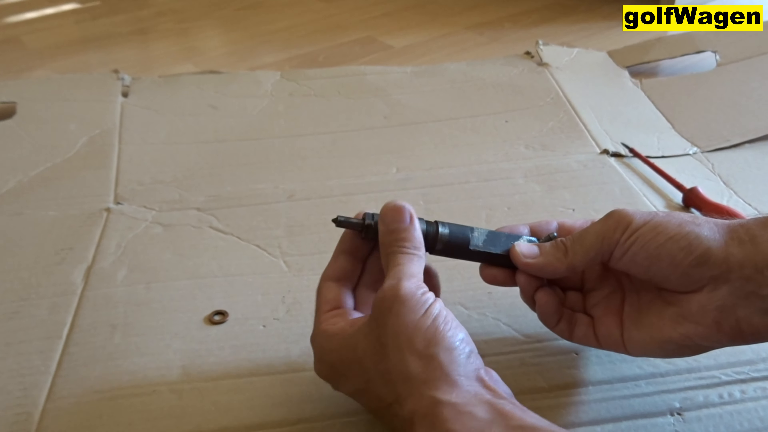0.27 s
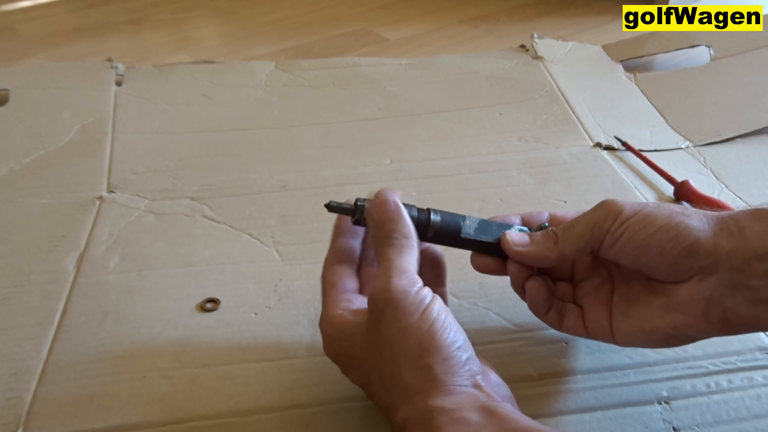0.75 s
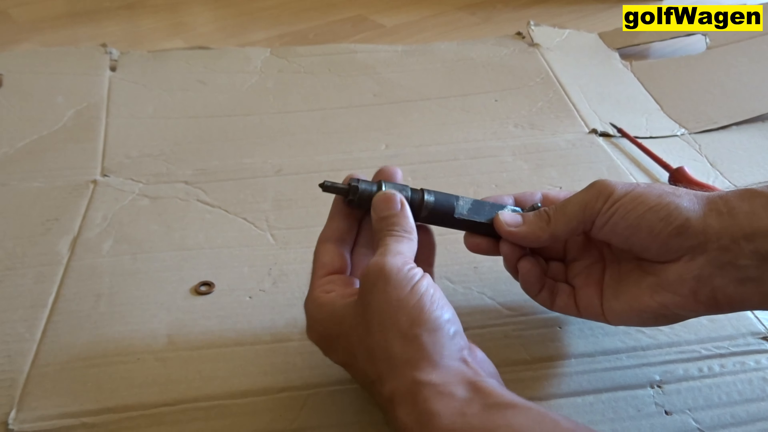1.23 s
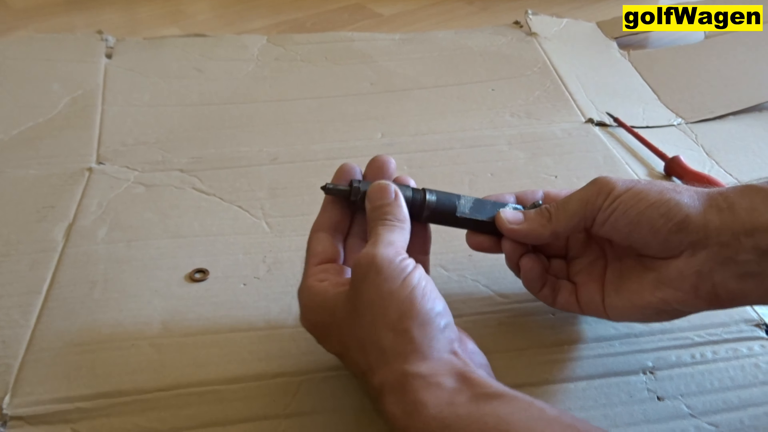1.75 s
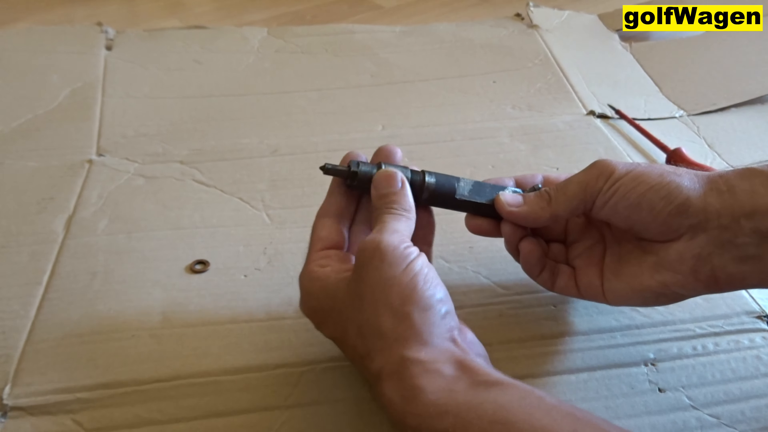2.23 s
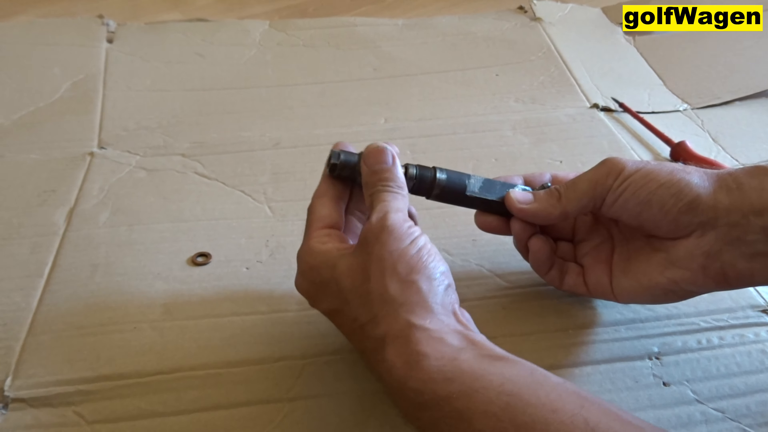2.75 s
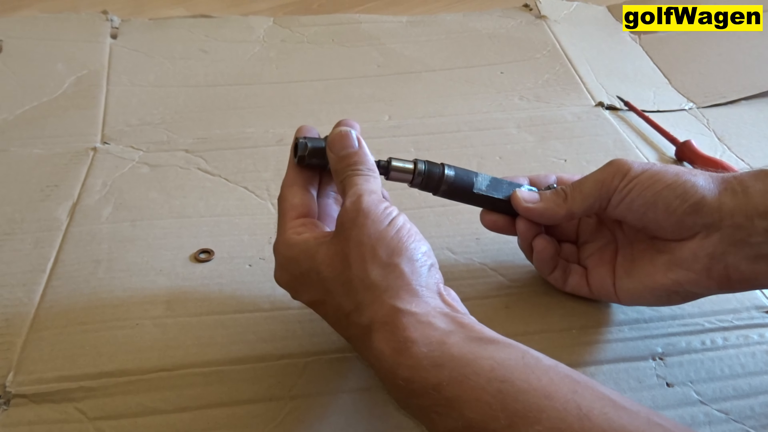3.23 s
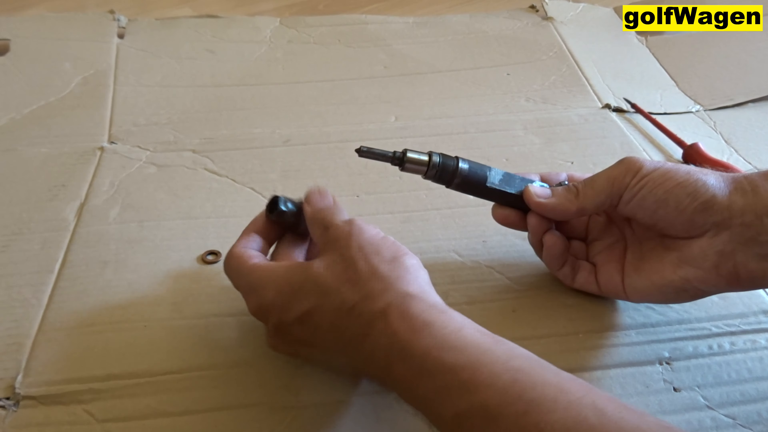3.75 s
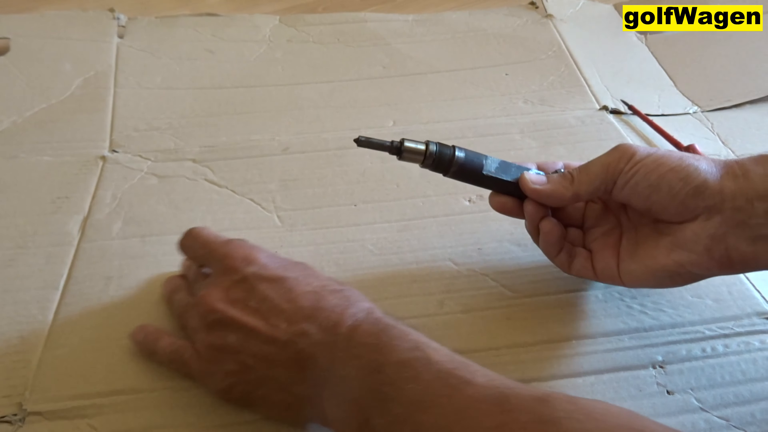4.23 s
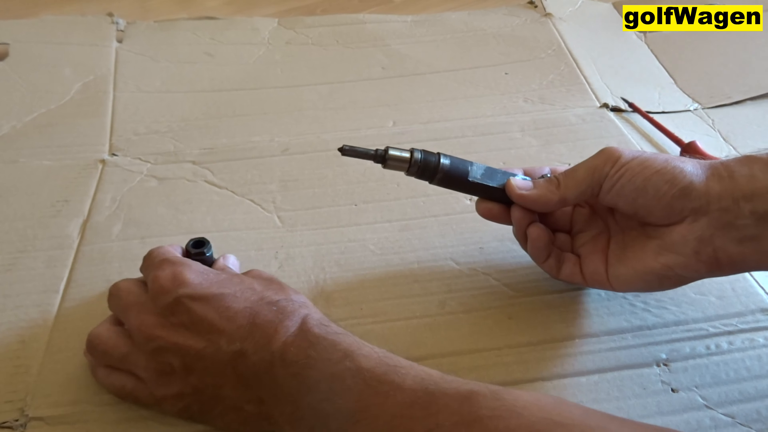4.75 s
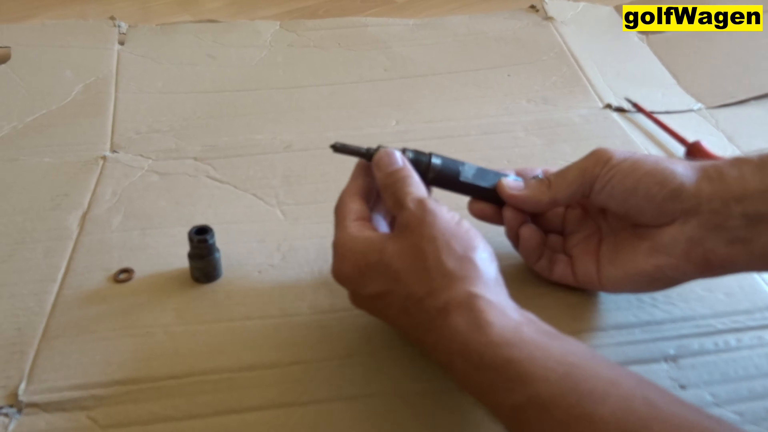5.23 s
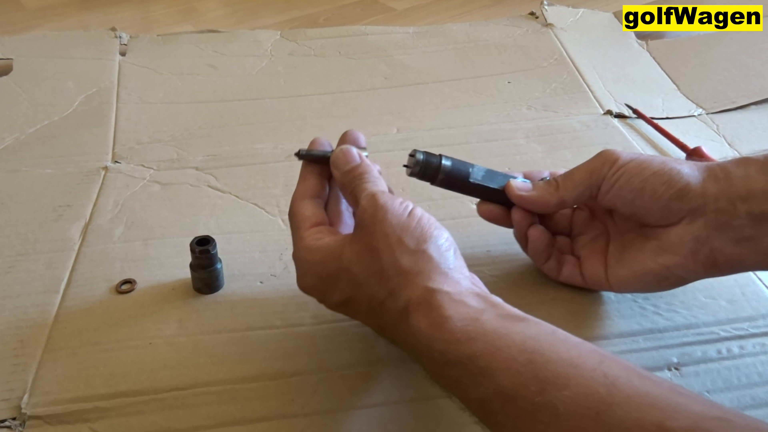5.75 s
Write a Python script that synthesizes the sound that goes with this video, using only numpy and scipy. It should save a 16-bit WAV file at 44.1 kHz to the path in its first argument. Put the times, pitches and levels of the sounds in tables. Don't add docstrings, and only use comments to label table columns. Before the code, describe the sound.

In a quiet, faintly humming workshop, a close small microphone hears a steel nut turned by hand in short gritty pushes with sharp clicks. It comes loose with bright rattling rings, then skin hisses over cardboard, the nut knocks down and scrapes, and faint ticks with a hollow rub follow.

```python
import sys
import numpy as np
from scipy import signal
from scipy.fft import rfft, irfft, next_fast_len
from scipy.io import wavfile
from scipy.ndimage import uniform_filter1d

SR = 44100
rng = np.random.default_rng(int(sys.argv[2]) if len(sys.argv) > 2 else 0)


def waveform_to_disk(signal):
    frames = np.transpose(np.atleast_2d(signal))
    scaled = np.clip(frames, -1, 1) * 32767
    samples = np.round(scaled).astype(np.int16)
    wavfile.write(sys.argv[1], SR, samples)


def gain_from_db(level_db):
    decades = np.asarray(level_db, float) / 20
    return 10 ** decades


N = 263717
TIME = np.arange(N) / SR
LOOSE_S = 2.34
SILENT_DB = -140
# (f/Hz, level/dB, t60/s)
FREE_RING = [(9970, -9, .12), (10050, -4, .17), (10078, 0, .22), (10140, -9, .12), (10250, -8, .1),
             (10430, -13, .07), (11560, -15, .1)]


def shade(x, points):
    hz, db = np.transpose(points)
    size = next_fast_len(N)
    bins_hz = np.fft.rfftfreq(size, 1 / SR)
    gain = gain_from_db(np.interp(np.log(bins_hz + 1), np.log(hz), db))
    return irfft(rfft(x, size) * gain, size)[..., :N]


def unit(x):
    return x / np.sqrt(np.mean(x ** 2))


def ring(x, hz, width):
    pole = np.exp((2j * np.pi * hz - np.pi * width) / SR)
    return signal.lfilter([1], [1, -pole], x).imag


def band(x, hz, width):
    return unit(ring(ring(x, hz, width), hz, width))


def glide(x, hz, width):
    turn = np.exp(2j * np.pi * np.cumsum(hz) / SR)
    pole = np.exp(-np.pi * width / SR)
    resonance = signal.lfilter([1], [1, -2 * pole, pole ** 2], x / turn)
    return unit((resonance * turn).imag)


def walk(rate):
    hold = int(SR / rate)
    steps = np.repeat(rng.standard_normal(N // hold + 1), hold)
    return unit(uniform_filter1d(steps, hold)[:N])


def grit(rate, spread_db, gust_db, gust_rate):
    sizes = rng.choice([-1, 1], N) * gain_from_db(spread_db * np.minimum(rng.exponential(size=N), 3))
    slips = (rng.random(N) < rate / SR) * sizes
    return unit(slips * gain_from_db(gust_db * walk(gust_rate)))


def blows(times, db):
    out = np.zeros(N)
    np.add.at(out, (np.asarray(times) * SR).astype(int), gain_from_db(db))
    return out


def bell(x, modes, scatter_db):
    out = np.zeros(N)
    for hz, db, t60 in modes:
        struck = x * gain_from_db(scatter_db * walk(440))
        out += gain_from_db(db) * ring(struck, hz, np.log(1000) / np.pi / t60)
    return out


def strokes(rows, attack_db_s, release_db_s, part=False):
    out = np.full(N, float(SILENT_DB))
    for start, end, first_db, last_db, part_db in rows:
        db = np.interp(TIME, [start, end], [first_db, last_db]) + part * part_db
        rise = attack_db_s * np.maximum(start - TIME, 0)
        fall = release_db_s * np.maximum(TIME - end, 0)
        out = np.maximum(out, db - rise - fall)
    return uniform_filter1d(out, size=200)


def shop():
    # (f/Hz, level/dB per Hz)
    shop_colour = [(15, -33), (25, -12), (150, -1.5), (208, -3.5), (232, -5.5), (288, -10.5), (457, -19),
                   (538, -3.5), (617, -9.5), (1510, -21), (2530, -20.5), (3230, -25.5), (14000, -29.5),
                   (15200, -28.5), (16500, -19)]
    # (f/Hz, side minus mid/dB)
    width_colour = [(30, -41), (60, -18), (125, -23.5), (250, -8.5), (500, -1.5), (1000, -1.5),
                    (4000, -7.5), (16000, -19)]
    # (f/Hz, width/Hz, level/dB)
    hums = [(119.5, 24, -68.5), (555, 144, -64), (1510, 150, -73), (15650, 200, -83)]
    mid, side = shade(rng.standard_normal((2, N)), shop_colour)
    hum = np.zeros(N)
    for hz, width, db in hums:
        hum += gain_from_db(db + 4.0 * walk(5.01)) * band(rng.standard_normal(N), hz, width)
    gain = gain_from_db(-56 + 1.3 * walk(6.3)) / np.std(mid)
    return gain * mid + hum, gain * shade(side, width_colour)


def arm():
    # (t/s, level/dB)
    arm_level = [(1.3, -63), (1.45, -62.5), (1.75, -61), (1.96, -59.5), (2.05, -60.5), (2.15, -55),
                 (2.3, -67), (3.62, -71), (3.72, -59.5), (4.1, -57), (4.4, -56.5), (4.6, -59),
                 (4.64, -49.5), (4.85, -57.5), (5.2, -55), (5.3, -59.5), (5.98, -54.5)]
    rumble = shade(rng.standard_normal(N), [(150, -9.5), (280, 1.5), (600, 1.5), (1200, -5.0), (2000, -22)])
    return gain_from_db(np.interp(TIME, *np.transpose(arm_level))) * unit(rumble)


def thread():
    # (f/Hz, width/Hz, level/dB)
    thread_modes = [(2640, 450, 6), (3500, 650, 4.5), (5260, 860, 2.5), (6500, 920, -14),
                    (8900, 230, -10.5), (10300, 320, -9.5), (11900, 1900, -0.5), (14200, 3300, -31)]
    # (t/s, f/Hz)
    grip_pitch = [(0, 11400), (.22, 10300), (.29, 11750), (.36, 11000), (.55, 11100), (.61, 10900),
                  (.67, 11100), (.89, 11400), (1.05, 11200), (1.3, 11210), (1.56, 10700), (1.6, 11900),
                  (1.64, 10800), (1.8, 10720), (1.83, 11100), (2.03, 11000), (2.1, 11450), (2.3, 11200)]
    # (from t/s, to t/s, first level/dB, last level/dB, low body modes relative level/dB)
    pushes = [(.01, .035, -48.5, -47, -7), (.24, .362, -48, -48.5, -8), (.555, .6, -48, -50, -7.5),
              (.62, .672, -43.5, -46.5, -8.5), (.888, .9, -48.5, -51.5, -5.5),
              (.935, 1.055, -59.5, -49, -6.5), (1.297, 1.307, -43, -42.5, -7.5),
              (1.34, 1.39, -54, -44.5, -6), (1.548, 1.643, -45.5, -43, -7), (1.69, 1.696, -49, -60, -19),
              (1.79, 1.886, -48, -37, -12.5), (2.045, 2.116, -41, -43, -9), (2.265, 2.3, -52.5, -44, -5)]
    rattles = [(2.314, 2.36, -30, -28.5, -13.5), (2.66, 2.7, -58, -54, -12), (3.37, 3.42, -65, -65, -20),
               (2.37, 2.474, -25.5, -42.5, -16.5), (2.492, 2.536, -39, -45, -14.5),
               (2.545, 2.56, -39, -45.5, -11.5), (2.765, 2.81, -32, -49, -21), (2.925, 2.978, -62, -62, -6),
               (3.029, 3.043, -33.5, -45, -27), (3.056, 3.1, -29, -40.5, -14.5),
               (3.123, 3.2, -46.5, -57, -8), (3.43, 3.45, -52, -59, -29)]
    push_attack_db_s, push_release_db_s = 446, 471
    rattle_attack_db_s, rattle_release_db_s = 5000, 400
    body_release_db_s = 175

    slips = grit(6000, spread_db=3, gust_db=1.8, gust_rate=220)
    grind = grit(9000, spread_db=3, gust_db=1.5, gust_rate=90)
    body, bright = np.zeros((2, N))
    for hz, width, db in thread_modes:
        if hz < 7500:
            body += gain_from_db(db + 3 * walk(45)) * glide(grind, hz * (1 + 0.03 * walk(25)), width)
        else:
            bright += gain_from_db(db + 2.2 * walk(45)) * glide(slips, hz * (1 + 0.0072 * walk(25)), width)

    rasp = unit(shade(grind[::-1], [(1200, -12), (2200, 0), (3300, -2.5), (7500, -10.5), (9000, -13)]))
    rasp_gain = np.where(TIME < LOOSE_S, 1.1, 2.2) * gain_from_db(2 * walk(120))
    low = unit(unit(body) + rasp_gain * rasp)

    main_hz = np.interp(TIME, *np.transpose(grip_pitch)) + 120 * walk(60)
    main = gain_from_db(2.5 * walk(150)) * glide(slips, main_hz, 720)
    held = unit(main + bright)

    rattle = unit(shade(slips, [(2000, -30.5), (8500, 0), (9800, 8), (11000, 13), (13000, 8), (16000, 0)]))
    loose = gain_from_db(-7.5) * rattle + gain_from_db(-5.5) * unit(bell(slips, FREE_RING, 0))

    level_db = np.maximum(strokes(pushes, push_attack_db_s, push_release_db_s),
                          strokes(rattles, rattle_attack_db_s, rattle_release_db_s))
    body_db = np.maximum(strokes(pushes, push_attack_db_s, body_release_db_s, part=True),
                         strokes(rattles, rattle_attack_db_s, body_release_db_s, part=True))
    return gain_from_db(level_db) * np.where(TIME < LOOSE_S, held, loose) + gain_from_db(body_db) * low


def knocks():
    # (t/s, peak level/dB, f/Hz, t60/s)
    board_contacts = [(.157, -44, 600, 0.074), (1.438, -32, 1060, 0.021), (1.954, -40.5, 790, 0.108),
                      (2.124, -41.5, 1473, 0.13), (2.147, -38.5, 1490, 0.054), (4.076, -26.5, 776, 0.1),
                      (4.08, -31, 820, 0.11), (4.182, -30, 950, .1), (4.183, -15, 1310, 0.031),
                      (4.189, -24.5, 948, 0.42), (4.202, -19.5, 1275, 0.04), (4.2175, -25.5, 1060, 0.11),
                      (4.234, -26, 1160, .08), (4.258, -25, 1070, 0.061), (4.247, -35, 1490, 0.042),
                      (4.292, -27, 1720, 0.046), (4.306, -26, 1780, 0.059), (4.316, -25, 1480, .05),
                      (4.326, -37, 1216, .05), (4.387, -32, 1150, .05), (4.339, -24.5, 1350, 0.044),
                      (4.415, -24, 1330, 0.062), (4.423, -27, 1200, 0.07), (4.445, -32, 1140, .05),
                      (4.464, -33, 1150, 0.046), (4.6317, -35, 2300, 0.023), (4.6317, -27, 1066, 0.049),
                      (4.706, -35, 1160, 0.091), (4.71, -34, 1340, 0.1), (4.717, -41, 806, 0.044),
                      (4.892, -38, 1730, 0.06), (4.896, -41, 1200, .06), (4.946, -40, 1130, 0.065),
                      (5.169, -41, 1460, .04), (5.188, -41, 460, 0.18), (5.191, -37, 1450, 0.058),
                      (5.264, -45, 590, .08), (5.275, -47, 555, 0.074)]
    # (frequency ratio, level/dB, share of the t60)
    partials = [(1, 4.5, 0.16), (1.4, -13.5, 1), (1.9, -17.5, 0.63), (2.6, -18.5, 0.37)]
    out = np.zeros(N)
    t = np.arange(4000) / SR
    onset = 1 - np.exp(-t / 0.00026)
    for s, db, hz, t60 in board_contacts:
        for ratio, part_db, life in partials:
            decay = gain_from_db(db + part_db - 60 * t / (t60 * life))
            out[int(s * SR):][:len(t)] += decay * onset * np.sin(2 * np.pi * ratio * hz * t)
    return shade(out, [(150, -5), (450, -2.0)])


def contacts():
    # (t/s, short ring level/dB, crack level/dB, crack f/Hz)
    clacks = [(0.2, -54, -44, 4940), (0.2028, -37.5, -33.5, 3500), (0.2097, -60, -34.5, 2600),
              (0.497, -52, -41, 2780), (0.5145, -64.5, -44.5, 2620), (.823, -52, -60, 5100),
              (1.225, -33.5, -32, 3730), (1.237, -39, -33.5, 2800), (1.531, -60, -36, 2570),
              (1.542, -34, -24, 5100), (1.772, -52, -32.5, 6240), (1.781, -29.5, -27.5, 4330),
              (1.8865, -12, -20, 6200), (1.9904, -48, -34.5, 6500), (2.119, -41, -32, 6000),
              (1.644, -51, -35, 2600), (2.241, -58, -46, 2000), (2.266, -52, -37, 2460),
              (2.251, -62, -45, 2100), (2.3146, -22, -20, 2480), (2.319, -23, -21.5, 2620),
              (2.323, -16, -22, 2580)]
    # (t/s, short ring level/dB, its f/Hz, long ring relative level/dB)
    pings = [(0.6098, -31, 10410, -35), (.616, -30, 11000, -35), (.619, -27, 11300, -35.5),
             (.6288, -34.5, 10900, -29.5), (1.545, -28.5, 10900, -13.5), (1.5423, -27.5, 8700, -24),
             (1.562, -29, 8700, -12), (1.176, -54, 11500, -30), (.2155, -48, 3400, -40),
             (.69, -49, 5200, -40), (2.3, -43, 2540, -40), (2.3085, -39, 2430, -99),
             (1.8872, -29, 5600, -43), (4.1835, -26, 2480, -99), (4.2008, -24, 2100, -99),
             (2.5, -44, 2035, -40), (2.4888, -33, 2270, -99), (2.4889, -30.5, 3060, -99),
             (2.4891, -34.5, 3800, -99), (2.4888, -35, 5900, -99), (2.4895, -20, 11000, -99),
             (1.8868, -36.5, 2800, -40), (2.547, -42, 11300, -99), (2.556, -47, 13800, -99),
             (1.376, -51, 5200, -99), (1.325, -51, 3500, -99)]
    # (t/s, short ring level/dB, crack level/dB, crack f/Hz, long ring level/dB)
    strikes = [(2.349, -40, -40, 2820, -38), (2.3645, -15, -18, 2340, -36), (2.3715, -25, -23, 2280, -33),
               (2.377, -30, -70.5, 3150, -31), (2.388, -30.5, -44.5, 2200, -28),
               (2.4887, -15, -35, 2800, -57), (2.501, -34, -55, 6000, -59), (2.4425, -50, -54, 2830, -60),
               (2.53, -52, -49, 2980, -63), (2.554, -36, -48, 3070, -61), (2.6303, -63, -51, 6500, -56),
               (2.7616, -23.5, -31.5, 7900, -36), (2.764, -30, -70, 7000, -49), (2.77, -33, -72, 4000, -48),
               (2.8398, -61, -44, 4740, -56), (2.841, -64, -37, 3200, -70), (2.8685, -60, -47, 5010, -71),
               (3.0263, -34, -41, 3440, -47), (3.0463, -41, -35, 5040, -31),
               (3.0511, -16.5, -22.5, 3380, -47), (3.057, -29, -26.5, 6300, -40),
               (3.0765, -45, -43, 3500, -48), (3.118, -48, -43, 4600, -36), (3.154, -44, -43, 2680, -47),
               (3.423, -41, -48, 2430, -57), (3.607, -52, -62, 2600, -80)]
    # (t/s, short ring level/dB, its f/Hz, crack level/dB)
    nozzle_ticks = [(4.184, -57, 8900, -39), (4.6315, -60, 8900, -54), (4.7055, -60, 8900, -56),
                    (5.354, -50, 13200, -55.5), (5.39, -56, 10400, -48), (5.402, -49, 8900, -47),
                    (5.415, -58, 8900, -51), (5.4364, -52, 11600, -57), (5.5556, -56, 11200, -65),
                    (5.596, -71, 9700, -53), (5.6198, -55.5, 11000, -63), (5.629, -60.5, 13300, -49)]

    def near(hz, spread_hz):
        return hz + spread_hz * np.clip(rng.standard_normal(), -2, 2)

    rows = [(s, db, near(11000, 360), crack, hz, db - 23) for s, db, crack, hz in clacks]
    rows += [(s, db, hz, SILENT_DB, hz, db + long) for s, db, hz, long in pings]
    rows += [(s, db, near(10200, 140), crack, hz, long) for s, db, crack, hz, long in strikes]
    rows += [(s, db, hz, crack, near(6000, 500), SILENT_DB) for s, db, hz, crack in nozzle_ticks]
    return np.transpose(rows)


def ticks():
    # (f/Hz, level/dB, t60/s)
    held_ring = [(8700, 0.5, 0.0256), (8973, -22, 0.019)]
    # (f/Hz, level/dB)
    crack_colour = [(1500, -13), (2200, 1.5), (3600, 3), (4600, 3.5), (5600, 5.5), (7500, 0.5),
                    (9000, -6.5), (11000, -1), (14000, -6.5), (16000, -10)]
    s, short_db, hz, crack_db, crack_hz, ring_db = contacts()
    t = np.arange(400) / SR
    short_shape = (1 - np.exp(-t / 0.00011)) ** 2 * np.exp(-t / 0.0016)
    shorts, cracks, spikes = np.zeros((3, N))
    for k, start in enumerate((s * SR).astype(int)):
        span = slice(start, start + len(t))
        shorts[span] += gain_from_db(short_db[k] + 3.0) * short_shape * np.sin(2 * np.pi * hz[k] * t)
        burst = rng.standard_normal(len(t)) * np.exp(-t / 0.0005)
        burst /= np.linalg.norm(burst)
        if crack_db[k] > -65:
            spikes[span] += gain_from_db(short_db[k] + 8.0) * burst
        note = np.sin(2 * np.pi * crack_hz[k] * t) * np.exp(-t / 0.0007)
        cracks[span] += gain_from_db(crack_db[k]) * (3.55 * burst + 0.69 * note)
    held = s < LOOSE_S
    rings = bell(blows(s[held], ring_db[held] + 5.0), held_ring, 1.4)
    rings += bell(blows(s[~held], ring_db[~held] - 8), FREE_RING, 3.3)
    spikes = shade(spikes, [(7000, -25), (9500, 5.5), (12500, 8.5), (16000, -16)])
    return shorts + spikes + shade(cracks, crack_colour) + rings


def squeaks():
    # (t/s, length/s, level/dB, first f/Hz, last f/Hz)
    sung_notes = [(0.638, 0.028, -49.5, 3560, 3500), (0.66, 0.0084, -47.5, 11400, 11300),
                  (1.05, 0.011, -42.5, 11300, 11200), (1.628, .017, -30.5, 11100, 11120),
                  (1.801, .017, -41.5, 9900, 10600), (1.89, 0.0046, -41, 8300, 9000),
                  (2.116, 0.006, -40, 8700, 9050), (2.257, .02, -48.5, 10200, 10200),
                  (2.338, .013, -29, 11220, 11300), (2.347, 0.0076, -33, 2820, 3100),
                  (2.4899, 0.0026, -13, 10300, 10200), (2.494, 0.0067, -36.5, 2750, 2730),
                  (2.777, .004, -29.5, 9900, 9900), (2.788, 0.0088, -36, 10000, 10070)]
    out = np.zeros(N)
    flutter = gain_from_db(2.2 * walk(650))
    for s, length, db, first_hz, last_hz in sung_notes:
        t = np.arange(int((length + 0.004) * SR)) / SR
        choke = np.exp(-np.maximum(t - length, 0) / 0.0005)
        shape = (1 - np.exp(-t / 0.0003)) * gain_from_db(-5 * t / length) * choke
        hz = np.interp(t, [0, length], [first_hz, last_hz])
        note = np.sin(2 * np.pi * np.cumsum(hz) / SR)
        out[int(s * SR):][:len(t)] += gain_from_db(db) * shape * note
    return out * np.where(TIME < LOOSE_S + 0.1, flutter, 1)


def thump():
    # (length/s, level/dB, f/Hz)
    length, db, hz = (0.045, -51, 118)
    swell = np.exp(-((TIME - 1.613) / length * 2) ** 2)
    return gain_from_db(db) * swell * np.sin(2 * np.pi * hz * TIME)


def brush():
    # (from t/s, to t/s, first level/dB, last level/dB, low part relative level/dB)
    skin_strokes = [(3.762, 3.87, -48.5, -41.5, -12.5), (3.87, 3.915, -46, -37.5, -8),
                    (3.915, 3.965, -37, -36, -12), (3.98, 4.15, -43, -47, -9.5),
                    (4.15, 4.23, -47.5, -36.5, -4), (4.23, 4.31, -38, -34.5, -5.5),
                    (4.31, 4.46, -38, -45, -3), (4.52, 4.8, -60.5, -56.5, -3),
                    (4.8, 4.888, -52.5, -44, -4.5), (4.94, 5.0, -59, -61.5, 1),
                    (5.0, 5.065, -57.5, -55, -4.5), (5.128, 5.18, -42.5, -44, -9),
                    (5.26, 5.38, -60, -68, -5), (5.72, 5.852, -66, -40, -19),
                    (5.885, 5.925, -43, -45.5, -18)]
    # (f/Hz, level/dB per Hz)
    skin_colour = [(300, -14.5), (800, 1), (2500, 1.5), (4000, -1), (8500, -3), (9500, 4), (11500, 7),
                   (13500, 1), (15800, -2)]
    # (t/s, length/s, f/Hz, level/dB)
    cupped_air = [
        (3.8, .05, 6700, -2),
        (3.858, 0.065, 6200, -3),
        (4.22, .04, 6300, -16),
        (4.423, 0.083, 3300, -11),
        (4.797, .04, 4000, -4),
        (4.858, 0.063, 4300, -7),
        (4.97, 0.067, 2700, -13),
        (5.058, .05, 2400, 1),
        (5.138, 0.045, 7350, -6),
    ]
    attack_db_s, release_db_s = 703, 209
    hiss = shade(grit(20000, spread_db=3.5, gust_db=0.75, gust_rate=58), skin_colour)
    low = shade(hiss, [(7500, 0), (10000, -25)])
    hollow = gain_from_db(-5.5) * band(hiss, 3630, 234) * (TIME > 5.7)
    air = grit(20000, spread_db=3, gust_db=1, gust_rate=60)
    for s, length, hz, db in cupped_air:
        hollow += gain_from_db(db) * np.exp(-((TIME - s) / length * 2) ** 2) * band(air, hz, 990)
    high_db = strokes(skin_strokes, attack_db_s, release_db_s)
    low_db = strokes(skin_strokes, attack_db_s, release_db_s, part=True)
    landed = np.clip((TIME - 3.76) / 0.011, 0, 1)
    return landed * (gain_from_db(high_db) * unit(hiss - low) + gain_from_db(low_db + 3.0) * (unit(low) + hollow))


def drag():
    # (from t/s, to t/s, first level/dB, last level/dB, board f/Hz)
    drags = [(3.797, 3.91, -64, -51.5, 940), (3.93, 4.055, -57, -53.5, 970), (4.069, 4.18, -45, -47, 870),
             (4.186, 4.25, -38.5, -39.5, 1100), (4.264, 4.348, -42, -40.5, 1310),
             (4.35, 4.42, -46, -42.5, 1200), (4.428, 4.476, -41.5, -45, 1150),
             (4.482, 4.524, -47, -54.5, 1130), (4.63, 4.658, -58, -61, 1030),
             (4.692, 4.772, -52, -53, 1280), (4.766, 4.91, -51.5, -49.5, 1180),
             (4.91, 4.99, -49.5, -48.5, 1120), (4.995, 5.077, -54, -56, 1170),
             (5.124, 5.2, -52.5, -48.5, 1100), (5.248, 5.3, -61, -60.5, 985)]
    # (f/Hz, width/Hz, level/dB)
    board_modes = [(1900, 520, -1), (2200, 200, -9), (2510, 220, 0)]
    slips = grit(2500, spread_db=3, gust_db=1.7, gust_rate=120)
    start, end, _, _, place_hz = np.transpose(drags)
    hz = np.interp(TIME, (start + end) / 2, place_hz)
    weight = gain_from_db(strokes(drags, attack_db_s=6000, release_db_s=247))
    notes = gain_from_db(3.4 * walk(50)) * glide(slips, hz * (1 + 0.043 * walk(40)), 210)
    notes += gain_from_db(3.5 + 2.4 * walk(50)) * glide(slips, 1.3 * hz, 820)
    upper = sum(gain_from_db(db + 2.8 * walk(45)) * band(slips, f, width) for f, width, db in board_modes)
    pressed = np.clip(weight / gain_from_db(-40.5), 0.3, 1)
    board = shade(notes + pressed * upper, [(300, -40), (700, 0)])
    return weight * unit(board)


def scene():
    near = arm() + thread() + knocks() + ticks() + squeaks() + thump() + brush() + drag()
    t = np.arange(int(0.5 * SR)) / SR
    t60_s = np.array([[0.3], [0.3], [0.012]])
    tails = rng.standard_normal((3, len(t))) * gain_from_db(-60 * t / t60_s)
    tails[:2] *= t > 0.004
    tails /= np.linalg.norm(tails, axis=1, keepdims=True)
    wet_mid, wet_side, spread = signal.fftconvolve(near[None], tails, axes=1)[:, :N]
    mid, side = shop()
    mid = mid + near + gain_from_db(-16) * wet_mid
    side = side + gain_from_db(-29) * wet_side
    side = side + gain_from_db(-15) * shade(spread, [(1000, -6.5), (9000, -1.0), (13000, -1.5)])
    side = side + gain_from_db(-43) * shade(near, [(300, -4), (9500, -5), (12500, 13)])
    return np.array([mid + side, mid - side])


def band_limit(x):
    return signal.sosfilt(signal.butter(12, 16990, fs=SR, output="sos"), x)


def record(dry):
    passed = shade(dry, [(22, -10), (40, 0), (15820, 0), (15950, -48), (16700, -50)])
    return band_limit(passed)


dry = scene()
out = record(dry)
waveform_to_disk(out)
```